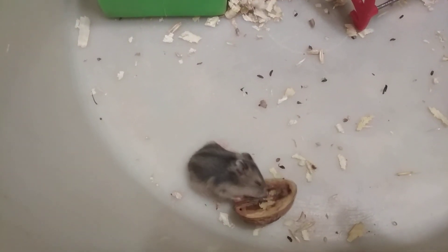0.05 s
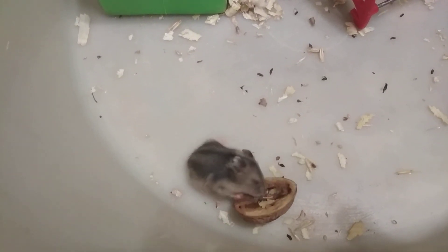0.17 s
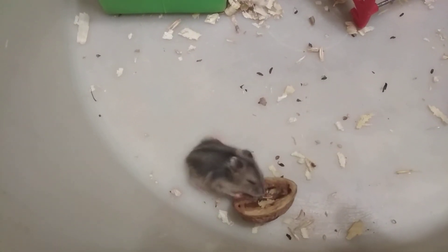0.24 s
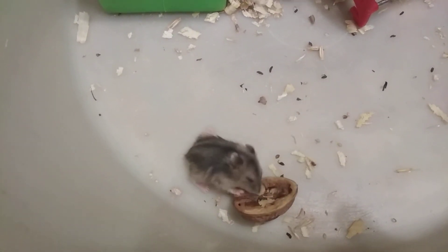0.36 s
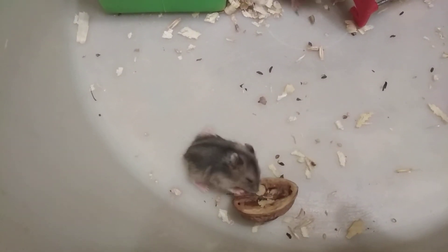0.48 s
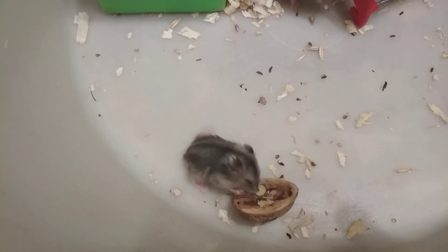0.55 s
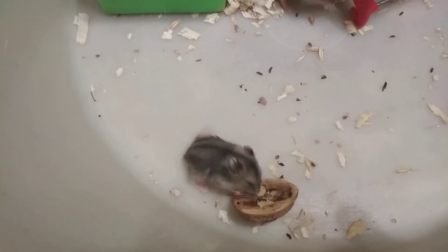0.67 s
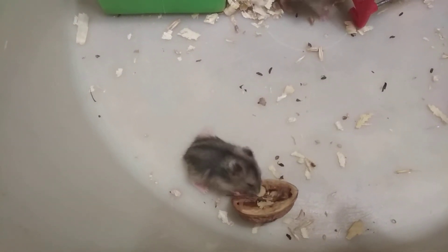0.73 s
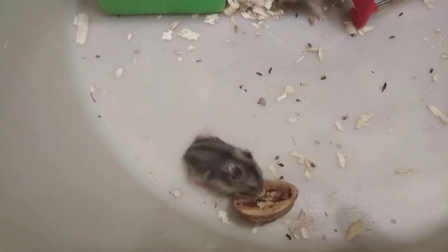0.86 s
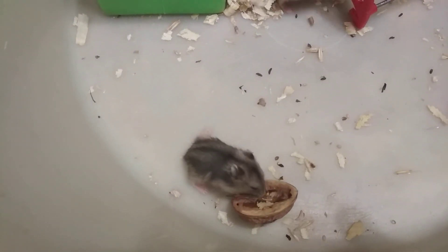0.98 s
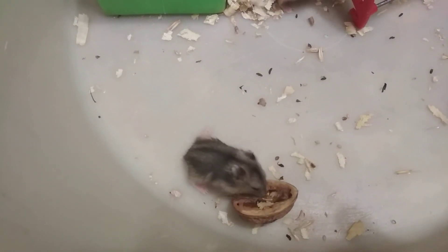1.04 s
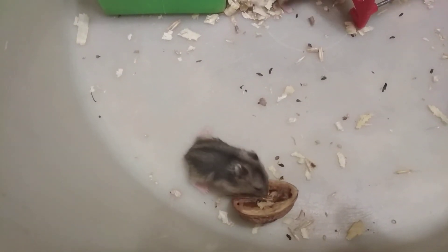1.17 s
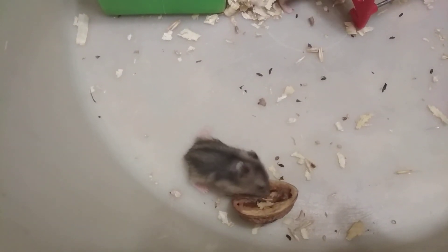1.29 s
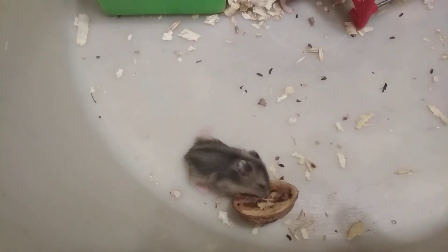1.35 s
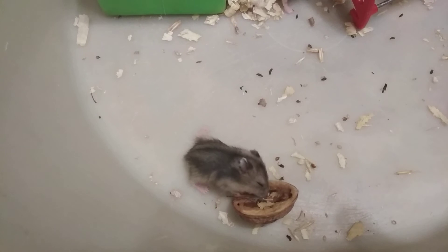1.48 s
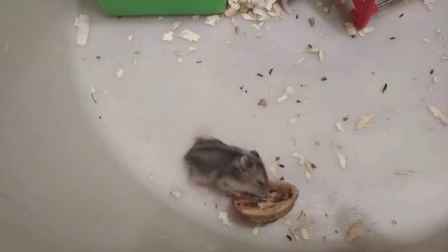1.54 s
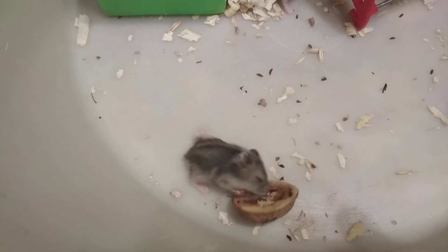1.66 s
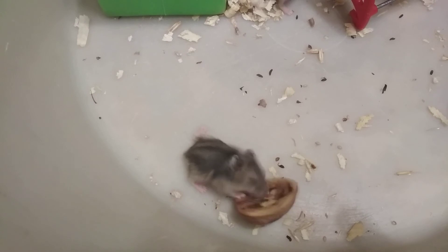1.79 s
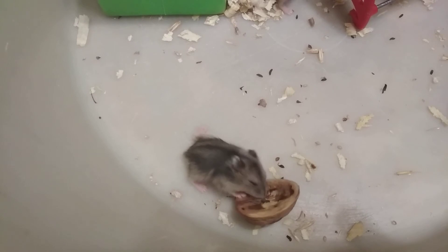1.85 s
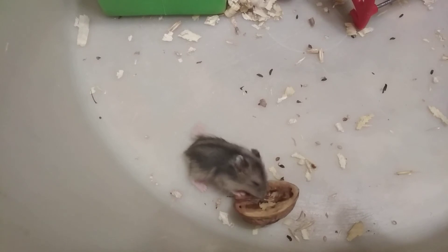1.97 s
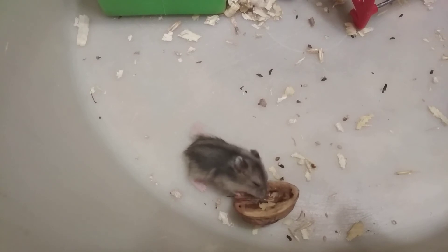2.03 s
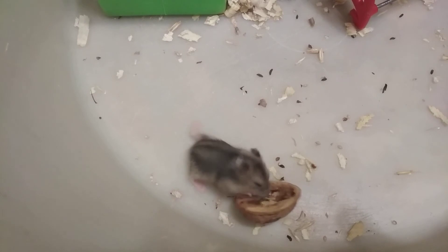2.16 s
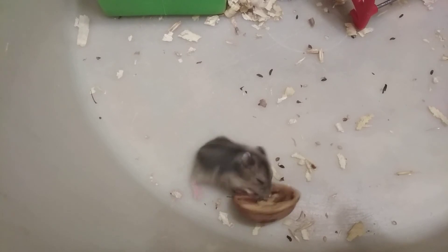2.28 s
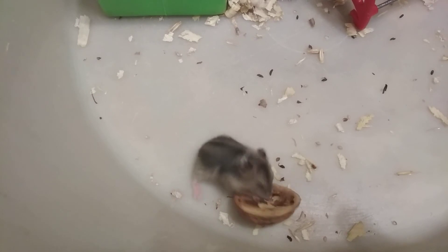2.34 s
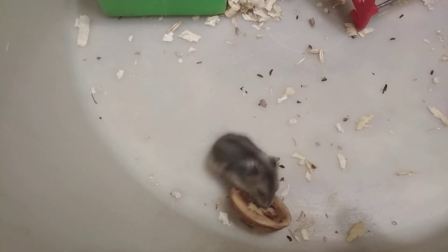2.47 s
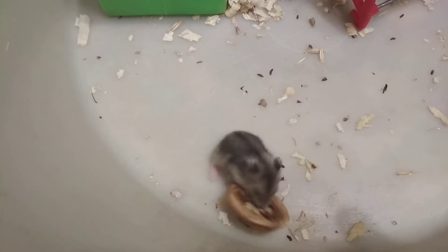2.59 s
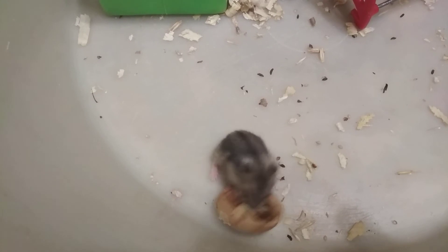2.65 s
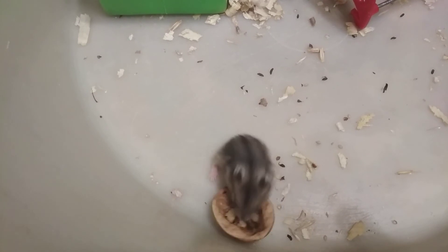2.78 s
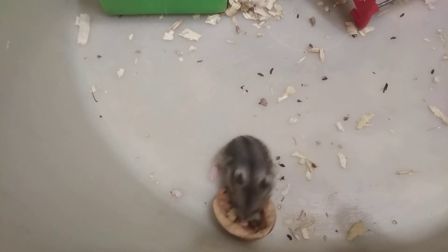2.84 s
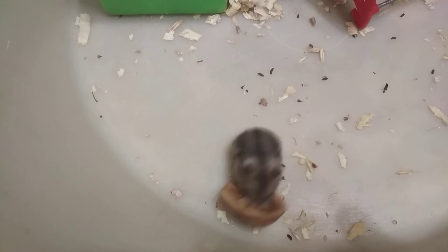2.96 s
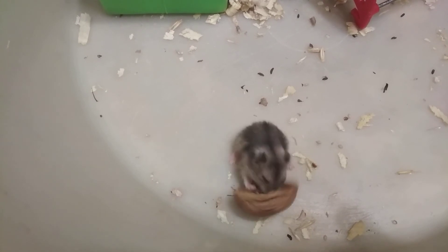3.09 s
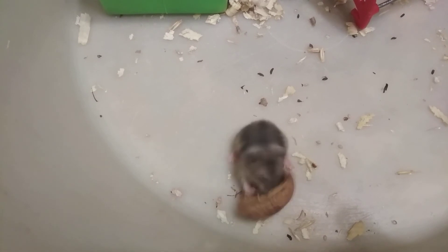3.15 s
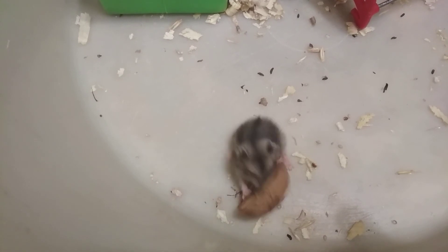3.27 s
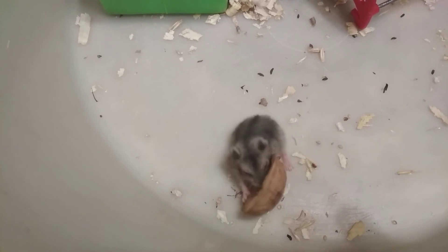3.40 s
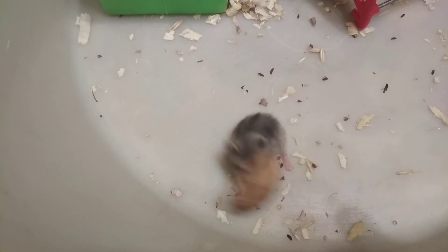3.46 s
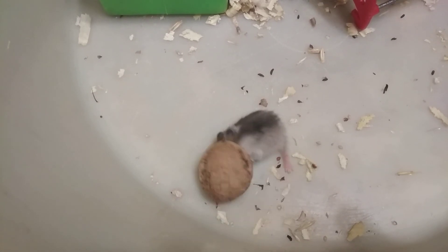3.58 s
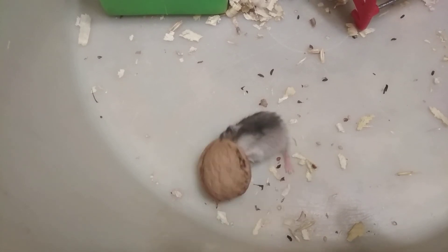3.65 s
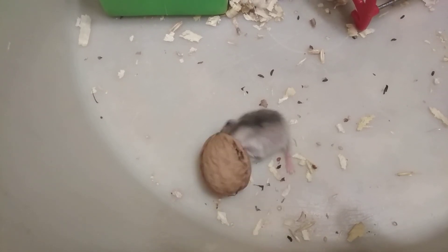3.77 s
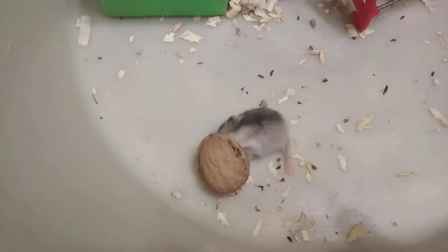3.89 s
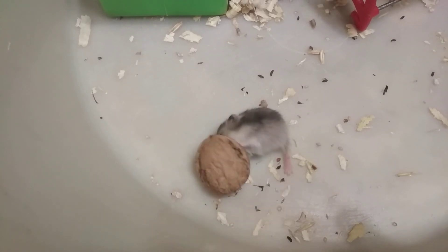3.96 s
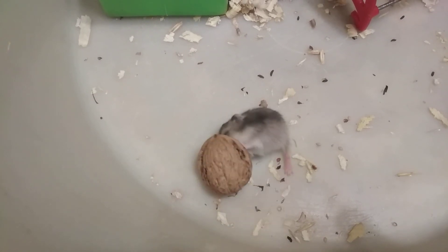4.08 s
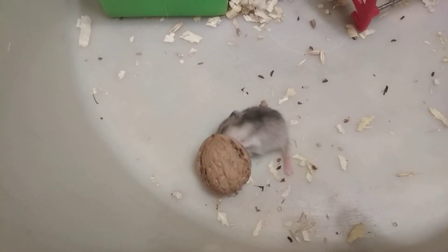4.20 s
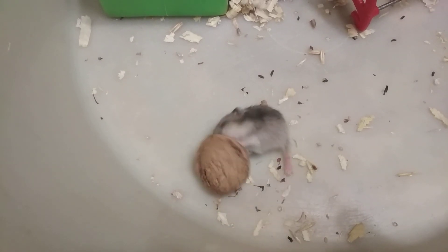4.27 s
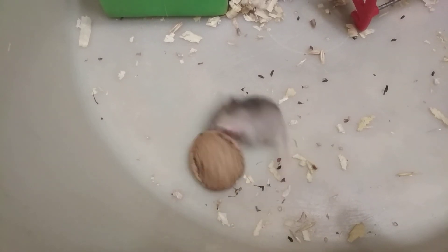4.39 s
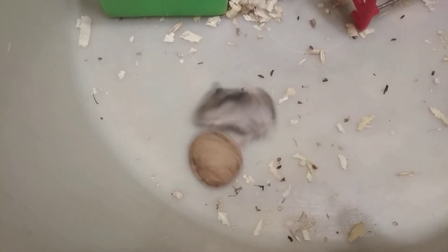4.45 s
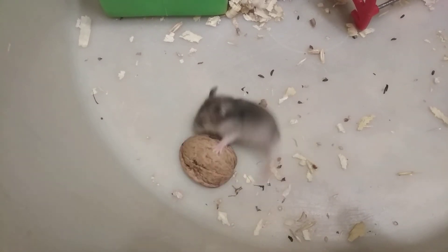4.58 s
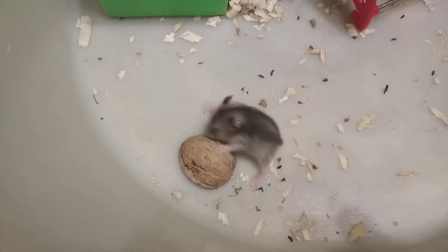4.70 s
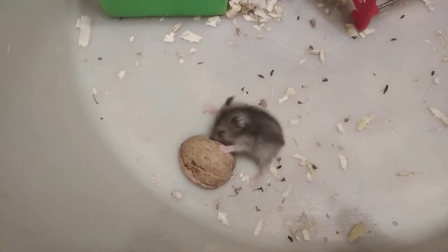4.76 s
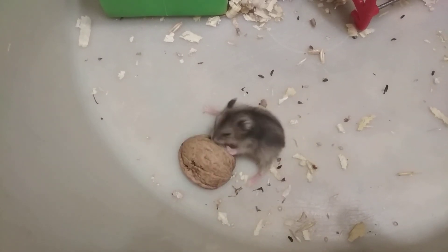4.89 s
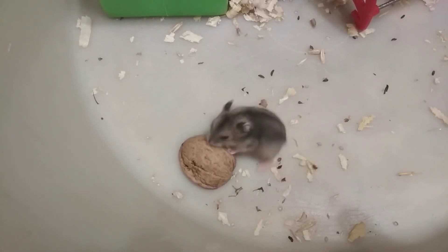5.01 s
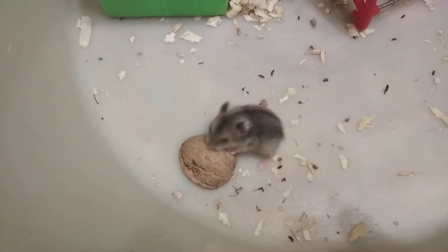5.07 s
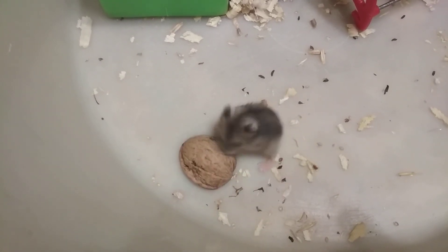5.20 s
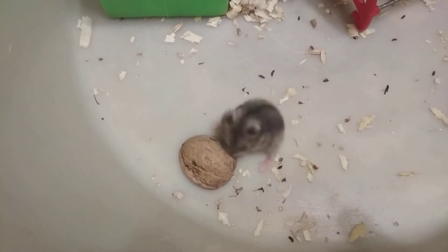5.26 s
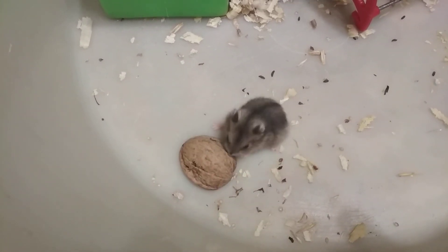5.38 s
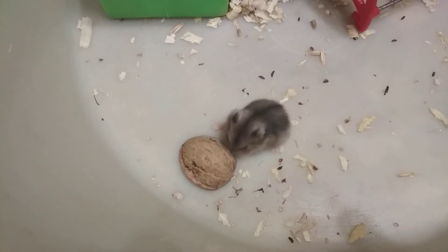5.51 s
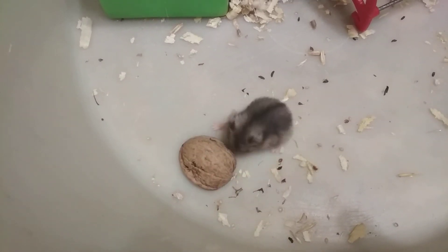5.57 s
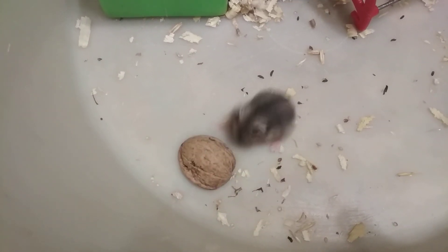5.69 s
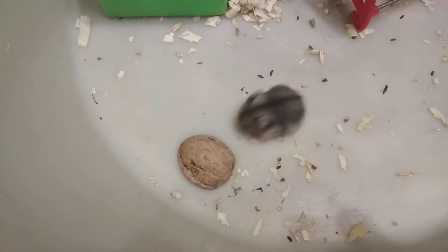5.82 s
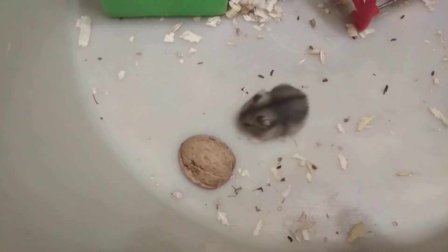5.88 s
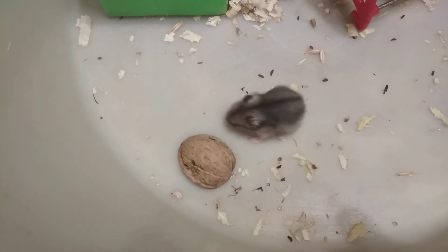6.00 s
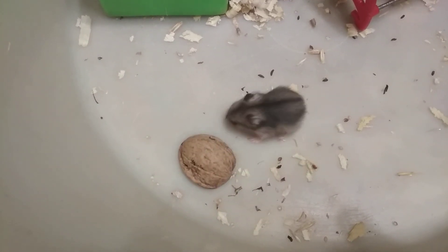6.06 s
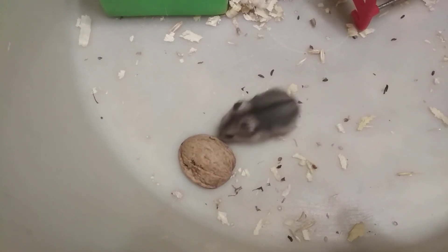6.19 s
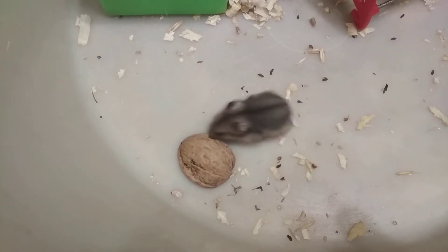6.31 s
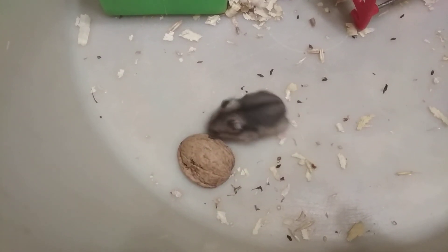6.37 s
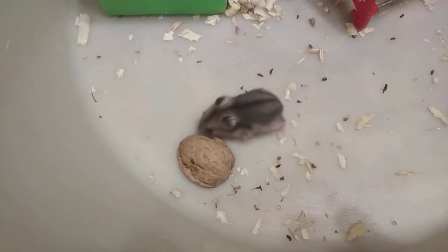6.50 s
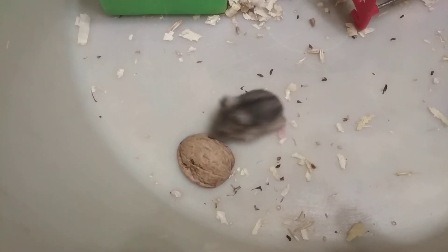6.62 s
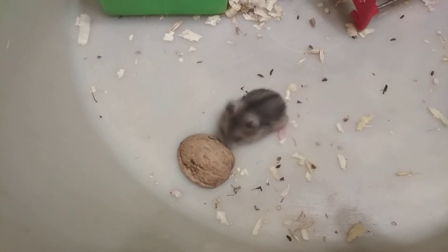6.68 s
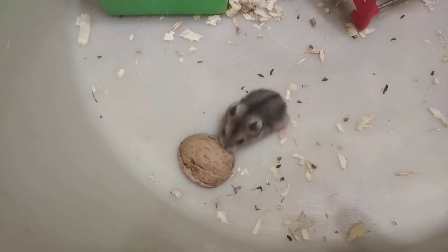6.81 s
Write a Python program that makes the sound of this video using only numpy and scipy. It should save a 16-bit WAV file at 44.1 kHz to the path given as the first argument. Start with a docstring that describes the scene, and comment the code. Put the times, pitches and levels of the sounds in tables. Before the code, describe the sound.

Sharp little tooth clicks and dry scratching over soft hollow thuds on plastic, then a loud double knock and sparser, quieter scuffs.

```python
"""A hamster gnaws a walnut shell in a plastic tub, then flips it over and walks around it.
Shell and paws knock the tub floor, a bank of damped modes that rings dully. Teeth and claws click
in short noise bursts and scratch in swells of tiny slips; the overturned shell slides on its
resonant rim. Two small microphones above the tub add hiss to low room rumble and a faint whine."""
import sys
import numpy as np
from scipy import signal
from scipy.fft import rfft, irfft
from scipy.io import wavfile
from scipy.ndimage import uniform_filter1d

SR = 44100
rng = np.random.default_rng(int(sys.argv[2]) if len(sys.argv) > 2 else 0)


def transcribe(u):
    """Save the signal u as a 16-bit wav file named by the first command-line argument.

    u: samples, shape (n,) or (channels, n), limited to [-1, 1]; the rate is SR.
    q: integer samples, one column per channel.
    """
    v = np.clip(np.atleast_2d(u).T, -1, 1)
    q = np.round(v * 32767).astype(np.int16)
    wavfile.write(sys.argv[1], SR, q)


N = 302085

# Relative spectrum of the bright part of clicks and scuffs.
# Each row: frequency in Hz, density in dB per Hz.
BRIGHT_SPECTRUM = [(3530, -44), (6000, -16), (8530, -9.5), (10500, 3), (12500, -1), (15600, -8),
                   (16200, -18.5), (16500, -21)]

WHINE_HZ, WHINE_DB = 13530, -88  # a faint steady electrical whine
ROOM_DB = -74  # RMS of rumble and hiss
EDGE_HZ = 16000  # top of the recorder's band

GNAW_END_S = 3.65  # gnawing stops, the animal scuffs about
BITE_RISE, SCUFF_RISE = 0.29, 0.54  # rise as a share of the fall: teeth dig in fast, paws brush evenly
FALL_SHAPE = 1.37  # 1 = dies away like a ring, 2 = bell-shaped
RASP_WIDTH, RASP_SINK = 0.85, 0.027  # width, and drop in pitch per fall time, as shares of the centre
FAINT_DB, FAINT_WIDTH = -77, 0.34  # scrapes below this level have a narrower, more pitched rasp
BRIGHT_PAN_DB, RASP_PAN_DB = -3.5, -1  # left-right

MAIN_HZ = 293  # reference pitch of the main ring
DETUNE = .018  # random share by which each blow shifts the middle and upper rings
CONTACT_S = 0.0012  # time constant with which every touch passes into the plastic
RING_DB = -12.5  # how much of a blow the floor radiates
# the upper ring: dB at level 0 and hardness 0, dB per dB of hardness, dB per dB of level
UPPER_DB, UPPER_PER_HARD, UPPER_PER_LEVEL = 13.5, 1.68, 1
BRIGHTEN_DB = 0.2528  # per dB of level: strong blows reach the top of the middle ring
CHATTER_S, CHATTER_DB, CHATTER_FADE_DB = .09, -15, -30  # length, start and fade of the bounces


def amp(db):
    """Decibels to a linear factor."""
    return 10 ** (np.asarray(db) / 20)


def evened(x):
    """Scales to an RMS of 1."""
    return x / np.sqrt(np.mean(x ** 2) + 1e-20)


def read(points, hz):
    """Reads a curve of (Hz, value) points along a logarithmic frequency axis."""
    f, value = np.transpose(points)
    return np.interp(np.log(hz + 1), np.log(f + 1), value)


def curves(rows):
    """Draws each column as a curve over the whole scene; the first column is time in seconds."""
    s, *columns = np.transpose(rows)
    return [np.interp(np.arange(N) / SR, s, column) for column in columns]


def panned(db):
    """Left and right factors that differ by db."""
    return amp(db * np.array([[.5], [-.5]]))


def colour(x, spectrum):
    """Minimum-phase filter of energy 1 with the given spectrum."""
    level_db = read(spectrum, abs(np.fft.fftfreq(4096, 1 / SR)))
    log_gain = np.log(amp(np.maximum(level_db, -100)))
    taps = np.fft.ifft(np.exp(np.conj(signal.hilbert(log_gain)))).real[:2048]
    return signal.oaconvolve(x, taps[None] / np.linalg.norm(taps), axes=1)[:, :N]


def grains(per_s, spread_db):
    """Sparse clicks of random sign, a few of them large."""
    size = amp(spread_db * np.minimum(rng.exponential(1, N), 5)) * rng.choice([-1, 1], N)
    return evened(size * (rng.random(N) < per_s / SR))


def resonate(x, hz, width):
    """One resonance on a moving pitch: shifts the curve hz down to zero, smooths, and shifts back."""
    turn = np.exp(2j * np.pi * np.cumsum(hz) / SR)
    r = np.exp(-np.pi * width / SR)
    return 2 * (turn * signal.lfilter([1 - r], [1, -r], x / turn)).real


def mottled(x, patchy_db):
    """Random level changes in patches across time and frequency give an uneven, mottled noise."""
    z = signal.stft(x, nperseg=256, noverlap=192)[2]
    patches = rng.standard_normal(z.shape[1:])
    patches = uniform_filter1d(patches, 2, 0)  # across frequency
    patches = uniform_filter1d(patches, 30, 1)  # across time
    z = z * amp(patchy_db * evened(patches))
    return signal.istft(z, nperseg=256, noverlap=192)[1][:, :N]


def walls(x, t60, wet_db, alike=0):
    """Dense reflections off the tub walls; alike is the share that both microphones hear the same."""
    t = np.arange(SR // 4) / SR
    tail = rng.standard_normal((2, len(t))) * amp(-60 * t / t60) * (t > .0007)
    alike = min(alike, 1)
    tail[1] = alike * tail[0] + np.sqrt(1 - alike ** 2) * tail[1]
    reflections = signal.oaconvolve(x, tail / np.linalg.norm(tail[0]), axes=1)[:, :N]
    return x + amp(wet_db) * reflections


def room():
    """Low room rumble and microphone hiss as shaped noise, with a sine for the whine."""
    # Relative noise spectrum. Each row: frequency in Hz, density in dB per Hz.
    noise_spectrum = [(12, -49), (20, 1), (104, -2.5), (182, -14.5), (293, 2.5), (542, -27), (642, -25.5),
                      (2200, -28), (2750, -40), (7110, -35.5), (8410, -46.5), (10500, -25.5),
                      (16000, -47.5)]
    # Left-right likeness of the noise. Each row: frequency in Hz, likeness from 0 to 1.
    likeness = [(30, 1), (300, 0.73), (1000, 0.17), (3000, 0)]
    hz = np.fft.rfftfreq(N, 1 / SR)
    left, other = rfft(rng.standard_normal((2, N)))
    same = np.clip(read(likeness, hz), 0, 1)
    right = same * left + np.sqrt(1 - same ** 2) * other
    noise = irfft(amp(read(noise_spectrum, hz)) * np.array([left, right]), N)
    whine = amp(WHINE_DB) * np.sin(2 * np.pi * WHINE_HZ * np.arange(N) / SR)
    return amp(ROOM_DB) * evened(noise) + whine


def slide():
    """Fine stick and slip rings two resonances of the hollow shell and a broad body; the lower one sinks."""
    # The overturned shell slides on its rim.
    # Each row: time in seconds, relative level in dB, lower rim resonance in Hz.
    path = [(3.68, -100, 2630), (3.71, -73.5, 2580), (3.78, -73.5, 2390), (3.84, -69.5, 2540),
            (3.93, -79, 2830), (4.0, -67, 2600), (4.07, -68, 2500), (4.15, -79, 2280), (4.22, -100, 1960)]
    level_db, hz = curves(path)
    slips = grains(2200, 7.8) + 1.56 * rng.standard_normal((2, N))
    upper_hz = 3850 + 0.16 * (hz - hz.mean())
    body_hz = np.full(N, 3150)
    rim = evened(resonate(resonate(slips, hz, 620), hz, 620))
    rim += 0.42 * evened(resonate(resonate(slips, upper_hz, 300), upper_hz, 300))
    body = evened(resonate(resonate(slips, body_hz, 1500), body_hz, 1500))
    audible = level_db > -99
    return amp(level_db) * audible * (rim + 0.68 * body)


def scratch():
    """Each scuff is a swell of tiny slips and hiss: a bright part and a duller rasp whose pitch sinks."""
    # Scrapes of teeth and scuffs through the shavings. Each row: peak in seconds, fall in seconds,
    # relative level in dB, dull rasp against it in dB, rasp centre in Hz.
    scuffs = [(0.094, 0.074, -68, -14, 2200), (0.172, 0.021, -53.5, -4, 5350),
              (0.248, 0.092, -60, -16, 3000), (.27, 0.042, -76, 6.5, 1950),
              (0.359, 0.034, -73.5, 0.5, 1510), (.47, 0.029, -89, 5, 1430), (0.652, 0.026, -77, 2, 5330),
              (0.733, 0.04, -60.5, -7, 4500), (0.789, 0.078, -65.5, -8.5, 2260),
              (.86, 0.043, -93, 23.5, 1550), (0.994, 0.036, -88, 3.5, 3980), (1.093, 0.046, -84.5, 6, 3620),
              (1.196, 0.044, -61.5, -29, 5000), (1.208, 0.027, -57, -4.5, 3070),
              (1.289, 0.038, -74, -10.5, 2970), (1.331, 0.15, -81, -23, 3120),
              (1.425, 0.019, -72, -38, 4020), (1.602, 0.039, -77, 7, 3770),
              (1.634, 0.039, -70.5, -4.5, 1720), (1.72, 0.081, -69.5, -2, 4830),
              (1.74, 0.04, -78.5, 5, 2360), (1.801, 0.096, -69, -11, 2840), (1.96, 0.088, -88, 11, 3490),
              (2.203, 0.062, -59, -14.5, 3430), (2.39, 0.13, -68, -25, 3180), (2.412, 0.042, -99, 12, 2100),
              (2.498, 0.0089, -55, -26, 4160), (2.64, 0.015, -100, 11, 2530),
              (2.745, 0.027, -102, 14, 1920), (2.585, 0.055, -66, -38, 5000),
              (2.686, 0.069, -58.5, -15, 4540), (2.929, 0.096, -64.5, -14.5, 3180),
              (3.061, 0.06, -72.5, -37, 4900), (3.147, 0.018, -66.5, 1, 5100),
              (3.21, 0.1, -70.5, -16.5, 5130), (3.361, 0.046, -72.5, -16, 5100),
              (3.429, 0.023, -97.5, 19, 1620), (3.48, 0.085, -67.5, -13, 5540),
              (3.584, 0.053, -63, -15, 1687), (3.8, 0.07, -78.5, -10, 6360), (3.93, 0.36, -74.5, -43, 5000),
              (4.048, 0.093, -75, 3, 4300), (4.15, 0.074, -100, 20.5, 1410),
              (4.402, 0.098, -71.5, -10, 6800), (4.483, 0.045, -59, 8.5, 2390),
              (4.577, 0.034, -62, -1, 2110), (4.619, 0.075, -77, 2, 3220), (4.702, 0.097, -93, 17, 1760),
              (4.766, 0.058, -67.5, -7, 3175), (4.91, 0.076, -91, 3, 1640), (4.968, 0.1, -75, -1.5, 3900),
              (4.998, 0.5, -79, -1.5, 5360), (5.128, 0.032, -58, -10, 3950),
              (5.149, 0.058, -66.5, -4.5, 2740), (5.2, 0.042, -93, 19, 1620),
              (5.354, 0.12, -72.5, -1.5, 4600), (5.388, 0.017, -73.5, 7.5, 1680),
              (5.431, 0.032, -70.5, 0.5, 2090), (5.525, 0.019, -86, 10, 2620),
              (5.534, 0.047, -100.5, 30, 1260), (5.723, 0.12, -88.5, -31, 3930),
              (5.878, 0.035, -69.5, -5, 1660), (5.884, 0.056, -90.5, 8, 4320),
              (6.032, 0.072, -77, -19, 3960), (6.17, 0.12, -76.5, -9, 5000), (6.167, 0.037, -71, 0, 1500),
              (6.389, 0.083, -70, -23, 4360), (6.701, 0.11, -86.5, -8, 5450),
              (6.748, 0.054, -111, 36, 1027)]
    t = np.arange(N) / SR
    slips = grains(1000, 4.5) + .9 * rng.standard_normal((2, N))
    drag = 1.1 * grains(1400, 3.8) + rng.standard_normal((2, N))
    bright, rasp = np.zeros(N), np.zeros((2, N))
    for s, fall, db, rasp_db, hz in scuffs:
        rise = fall * (BITE_RISE if s < GNAW_END_S else SCUFF_RISE)
        near = slice(max(round((s - 3 * rise) * SR), 0), round((s + 4 * fall) * SR))
        since = t[near] - s
        distance = since / np.where(since < 0, rise, fall)
        swell = amp(db) * np.exp(-(distance ** 2) ** np.where(since < 0, 1, FALL_SHAPE / 2))
        bright[near] += swell
        centre = hz * np.exp(-RASP_SINK * since / fall)
        width = (FAINT_WIDTH if db < FAINT_DB else RASP_WIDTH) * hz
        band = drag[:, near]
        for _ in range(3):
            band = resonate(band, centre, width)
        rasp[:, near] += amp(rasp_db) * swell * evened(band)
    sound = colour(evened(slips) * bright, BRIGHT_SPECTRUM) * panned(BRIGHT_PAN_DB)
    sound = sound + rasp * panned(RASP_PAN_DB)
    return walls(mottled(sound, patchy_db=4.5), .05, -4)


def clicks():
    """Each snap is a burst of noise a few milliseconds long, with a bright and a duller part."""
    # Snaps of teeth and claws.
    # Each row: start in seconds, relative level in dB, duller body against the snap in dB.
    snaps = [(0.1663, -14, -58), (0.168, -15, -59), (.172, -38, -51), (0.2137, -31, -19.5),
             (0.2563, -34, -15), (0.298, -36, -42), (0.374, -30, -47), (.695, -39, -40), (0.7122, -32, -55),
             (0.721, -28, -57), (0.735, -29, -61), (0.745, -25, -53), (0.774, -43.5, -14),
             (0.787, -25.5, -51), (1.1863, -21, -50), (1.2157, -47, -53), (1.239, -29, -57),
             (1.306, -34.5, -57), (1.3678, -32, -44), (1.528, -44.5, -54), (1.595, -45, -17.5),
             (1.679, -28.5, -49), (1.6967, -33, -52), (1.703, -19, -56), (1.725, -27, -43),
             (1.7347, -27, -32), (1.748, -29.5, -28), (1.803, -26, -62), (1.952, -54, -4),
             (2.194, -30, -33), (2.213, -23, -32), (2.3953, -28.5, -61), (2.495, -41, -39),
             (2.565, -31.5, -60), (2.667, -21, -59), (2.674, -16, -38), (2.693, -25, -43),
             (2.913, -31.5, -33.5), (2.922, -33.5, -30), (3.05, -26, -44), (3.1418, -27.5, -53),
             (3.1923, -22, -59), (3.3394, -24, -42.5), (3.466, -25, -44), (3.529, -36, -55),
             (3.5852, -25.5, -44), (3.893, -46, -48), (3.95, -43, -47), (3.959, -36.5, -45),
             (4.052, -24, -53), (4.102, -42, -40), (4.204, -63.5, 3.5), (4.353, -36, -45), (4.37, -44, -54),
             (4.45, -11, -15.5), (4.5331, -21, -16), (4.5427, -38, -5), (4.5481, -15.5, -41),
             (4.581, -26, -27), (5.001, -37, -30), (5.1154, -42, -21), (5.132, -29, -32),
             (5.3876, -44, -22), (5.4312, -30, -26.5), (5.869, -55.5, -23), (6.006, -44, -38),
             (6.128, -42, -20), (6.16, -55, -17), (6.34, -40, -39), (6.394, -45, -38)]
    # Relative spectrum of the duller body. Each row: frequency in Hz, density in dB per Hz.
    dull_spectrum = [(760, -47), (1300, -13), (1610, -6), (1860, -15.5), (2280, -12), (3020, -5.5),
                     (8000, -23.5), (10400, -38), (17600, -120)]
    # Right of centre, then over to the left as the animal walks.
    # Each row: time in seconds, left-right difference in dB.
    pan_path = [(0, -3), (3.6, -9), (4.6, -4), (6.85, 20.5)]
    bright, dull = np.zeros((2, 2, N + SR))
    t = np.arange(400) / SR
    shape = t / 0.0037 * np.exp(1 - t / 0.001)
    bursts = rng.standard_normal((len(snaps), 3, len(t))) * shape
    for (s, db, body_db), (both, left, right) in zip(snaps, bursts):
        pan_db = np.interp(s, *np.transpose(pan_path))
        snap = amp(db) * panned(pan_db) * (both + 1.71 * np.array([left, right]))
        start = round(s * SR)
        bright[:, start:][:, :len(t)] += snap
        dull[:, start:][:, :len(t)] += amp(body_db) * snap
    sound = amp(-15) * colour(bright[:, :N], BRIGHT_SPECTRUM) + colour(dull[:, :N], dull_spectrum)
    return walls(sound, .05, -5)


def blow_push(db, hardness_db, hz, phase):
    """A smooth push on each mode: a soft blow builds up slowly, and high modes start sooner."""
    rise = np.clip(.002 - 0.00043 * hardness_db - 0.00009 * (db + 5.5), .002, .025)
    rise = rise * np.minimum(330 / hz, 1)[:, None] ** 1.5
    t = np.arange(round(rise.max() * SR) + 1) / SR
    wave = -np.exp(1j * (2 * np.pi * hz[:, None] * t + phase[:, None]))
    return wave * 2 * np.sin(np.pi * np.minimum(t / rise, 1)) ** 2 / (rise * SR)


def tub():
    """Every blow and the patter drive the same modes; each blow shares itself out among them differently."""
    # Blows on the floor: a padded paw booms, the hard shell wakes the middle ring. Each row: start in
    # seconds, relative level in dB, low boom in dB, hardness in dB, main ring in Hz, varying from
    # blow to blow.
    knocks = [(0.064, -27, -26, -10.5, 302), (0.172, -58, -19, -6, 282), (0.215, -41, -43, -2.5, 274),
              (0.244, -45.5, -18, -3, 297), (0.268, -45, -8, 0, 296), (0.329, -33, -25, -13.5, 264),
              (.36, -50.5, -9, 3, 316), (0.415, -43.5, -7.5, -14, 297), (.606, -40, -6.5, -13.5, 293),
              (0.838, -41, 10.5, -7, 300), (0.851, -27.5, -7, -16, 297), (0.958, -33.5, -14, -13, 292.5),
              (1.069, -42, 2.5, -28, 293.5), (1.163, -31.5, -8, -30.5, 297.3),
              (1.237, -54.5, -6, -2.5, 280), (1.343, -43.5, -15, -25, 315), (1.365, -37, -6, -18.5, 302.5),
              (1.545, -41.5, -8, -44, 283), (1.593, -37.5, -25, -22.5, 300), (1.769, -75, -30, 15, 296),
              (1.805, -37.5, -4, -12, 277), (1.848, -34.5, -3.5, -24, 305), (1.868, -50, -19, 5, 307),
              (1.937, -40, -0.5, -4.5, 336), (1.966, -35, 2, -7.5, 299.5), (2.147, -33.5, -1.5, -11.5, 310),
              (2.16, -32.5, -30, -11.5, 294), (2.313, -44.5, -19, 0, 294), (2.403, -36, -5.5, -19, 294),
              (2.437, -50, -22, -5, 286), (2.458, -58.5, -16, 3, 300), (2.471, -34, -24, 4.5, 304.4),
              (2.51, -36.5, -23, 2, 286), (2.533, -44, -30, -9, 306), (2.548, -38, -21, -5, 296),
              (2.58, -44.5, -14, 6, 286), (2.602, -37.5, -16, 6, 285), (2.687, -38, -11, -5.5, 296.5),
              (2.772, -39, -25, -4, 303), (2.85, -54, -30, -1, 282), (2.919, -32.5, -27, -27, 298.6),
              (2.971, -31, -15, 0, 294), (3.036, -46, -25.5, -14, 308), (3.05, -29.5, -60, -1, 291),
              (3.142, -47, -18, -0.5, 282), (3.182, -32, -25, -4, 287), (3.24, -42, -33, -9, 304),
              (3.267, -47.5, -40, 2.5, 280), (3.281, -43.5, -43, 1, 314), (3.339, -34, -32, -16, 301),
              (3.416, -43, -12, -5, 275), (3.473, -30, -42, -20.5, 268), (3.51, -55.5, -28, 3.5, 303.5),
              (3.595, -51, -41, -19, 277), (3.709, -60, -34, 5.5, 322), (3.782, -48.5, -31, 1.5, 310),
              (3.828, -49.5, -33, -1.5, 297.6), (3.919, -68, -30, 10, 259), (4.07, -31, -0.5, -15.5, 286.5),
              (4.143, -44, -31, -4, 297), (4.315, -54.5, -27.5, -23, 253), (4.449, -14.5, -22.5, -2, 281.3),
              (4.5331, -26, -11.5, 9, 293), (4.54, -36, -28, 15, 290), (4.546, -17.5, -10.5, -1, 277.3),
              (4.66, -35, -13, -14, 282.5), (4.808, -61.5, 18, 4.5, 294), (4.834, -47, -16, -14, 301),
              (4.877, -48, 2, -13.5, 302), (4.997, -38.5, -0.5, -19, 322.4), (5.05, -45.5, 12.5, -8, 301),
              (5.153, -44.5, 0, -2.5, 284), (5.195, -47, -22, 6.5, 296), (5.328, -38, -9, -23, 302),
              (5.383, -37, -1, -7, 319), (5.428, -49.5, -12, 3.5, 277), (5.51, -41, -23.5, 1, 312),
              (5.625, -41, -21.5, -34, 309), (5.688, -42, -22, -7, 296.7), (5.87, -65.5, -19, 7, 282.3),
              (5.919, -45.5, -32, -22, 306), (6.008, -48.5, -28, -3, 314), (6.081, -37, -8.5, -44, 279),
              (6.125, -39.5, 1.5, -4.5, 298.6), (6.228, -43.5, -25, -25, 282),
              (6.341, -42, -45, -19, 311.7), (6.476, -43.5, -22, -31, 295),
              (6.612, -43, -22.5, -15.5, 314.4), (6.715, -29, -9, -15, 297.3)]
    # Paws and the rocking shell keep the floor trembling. Each row: time in seconds, relative level in dB.
    patter = [(0.0, -57.5), (0.27, -48.5), (0.46, -68.5), (1.07, -56), (1.16, -64.5), (1.89, -59.5),
              (1.96, -54), (2.65, -53.5), (2.75, -56), (3.38, -91), (3.53, -58), (4.43, -74), (4.6, -63),
              (6.22, -66), (6.45, -76.5), (6.85, -49.5)]
    # The floor's modes. Each row: frequency in Hz, relative level in dB, decay by 60 dB in seconds.
    modes = [(143, -8.5, 0.26), (170, 1, 0.13), (222.3, -5, 0.026), (273.4, 1.5, 0.12), (295.6, 3.5, 0.058),
             (308, 3, 0.16), (350.3, -5, 0.07), (525, 5, 0.024), (663, -3.5, 0.16), (698.3, 7.5, 0.048),
             (763.4, 4.5, 0.027), (846.5, -2.5, 0.04), (904.3, -2, 0.048), (1007, -1, 0.042),
             (1126, -2, 0.02), (1242, 4, 0.039), (1425, 7.5, 0.04), (1518, 10, 0.028), (1638, 3.5, 0.039),
             (1727, 11.5, 0.032), (2060, 0.5, 0.061), (2109, 0.5, 0.035), (2390, 2.5, 0.049),
             (2770, -1.5, 0.025), (2870, -8.5, 0.02), (3426, -5.5, 0.024)]
    # Edges in Hz between boom, main, middle and upper rings.
    group_hz = [190, 260, 420, 560, 1050, 1300]
    # How far the sound leads on the left. Each row: frequency in Hz, lead in radians.
    left_lead = [(100, -.1), (400, .15), (860, .6), (1400, 2.2), (2200, 2.5), (3500, 2)]
    # How far the sound leans to the left. Each row: frequency in Hz, left-right difference in dB.
    left_lean = [(100, 2.5), (200, 2), (380, -8), (1300, -0.5), (3500, -6.5)]
    hz, mode_db, t60 = np.transpose(modes)
    force = np.zeros((len(modes), N + SR // 10), complex)
    chatter = rng.random((len(knocks), 2, 18))
    luck = rng.standard_normal((len(knocks), 2 * len(modes)))
    for (s, db, boom_db, hardness_db, _), draw, (wait, size) in zip(knocks, luck, chatter):
        middle_top_db = hardness_db + BRIGHTEN_DB * (db + 32.5)
        upper_db = UPPER_DB + UPPER_PER_HARD * hardness_db + UPPER_PER_LEVEL * db
        share_db = np.interp(hz, group_hz, [boom_db, 0, 0, hardness_db, middle_top_db, upper_db])
        share_db = share_db + 2.6 * draw[::2]
        push = blow_push(db, hardness_db, hz, .5 * draw[1::2])
        force[:, round(s * SR):][:, :push.shape[1]] += amp(db + share_db)[:, None] * push
        # the shell chatters on in a few light bounces, too quick to move the lowest modes much
        bounce_db = db + share_db[:, None] + CHATTER_DB + CHATTER_FADE_DB * wait - 11 * size
        bounce_db = bounce_db - 9 * (hz[:, None] < group_hz[2])
        bounce_at = np.round((s + .003 + CHATTER_S * wait) * SR).astype(int)
        force[:, bounce_at] -= amp(bounce_db) * np.exp(7j * size * draw[::-2, None])
    taps = amp(curves(patter)[0]) * grains(200, 4.1)
    tap_db = np.interp(hz, group_hz, [-36.0, -24.5, -23.5, -45, -44.5, -62.0])
    out = np.zeros((2, N))
    # each blow's shift in pitch holds until the next blow
    last = np.maximum(np.searchsorted([row[0] for row in knocks], np.arange(N) / SR) - 1, 0)
    main_bend = np.array([row[4] for row in knocks]) / MAIN_HZ - 1
    for k, f in enumerate(hz):
        bend = main_bend if f < group_hz[2] else DETUNE * luck[:, 2 * k + 1]
        turn = np.exp(2j * np.pi * f * np.cumsum(bend[last]) / SR)
        drive = force[k, :N] + np.roll(taps, 37 * k) * amp(tap_db[k])
        pole = np.exp(2j * np.pi * f / SR) * amp(-60 / (t60[k] * SR))
        soft = np.exp(2j * np.pi * f / SR - 1 / (CONTACT_S * SR))
        ring = signal.lfilter([1 - abs(soft)], np.poly([pole, soft]), drive / turn) * turn
        ring = -1j * amp(mode_db[k] + RING_DB) * ring
        side = amp(read(left_lean, f) / 2) * np.exp(.5j * read(left_lead, f))
        out += np.array([(ring * side).real, (ring / side).real])
    # the floor's ring keeps out of the deep bass and the treble
    out = signal.sosfilt(signal.butter(2, [95, 4200], "band", fs=SR, output="sos"), out)
    # the upper clatter has a stronger, wider and slightly shorter tail than the bass
    upper = signal.sosfilt(signal.butter(2, 850, "high", fs=SR, output="sos"), out)
    return walls(out - upper, .26, -11.5, alike=.92) + walls(upper, .22, -7.5, alike=.8)


def scene():
    """All layers together."""
    return room() + slide() + scratch() + clicks() + tub()


def record(dry):
    """The band limit of the recorder: a steep low-pass."""
    low_pass = signal.firwin(511, EDGE_HZ, window=("kaiser", 9), fs=SR)
    return signal.oaconvolve(dry, low_pass[None], "same")


dry = scene()
out = record(dry)
transcribe(out)
```